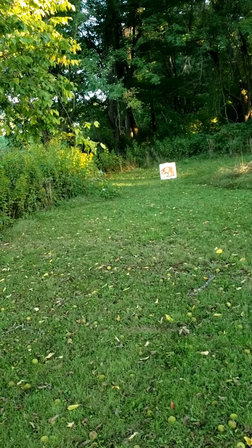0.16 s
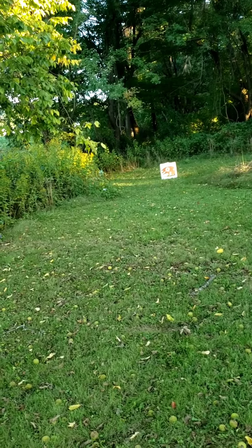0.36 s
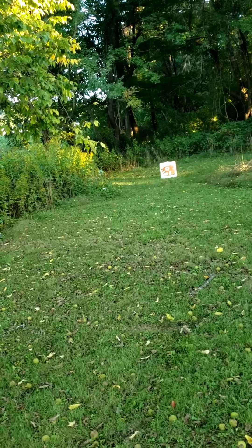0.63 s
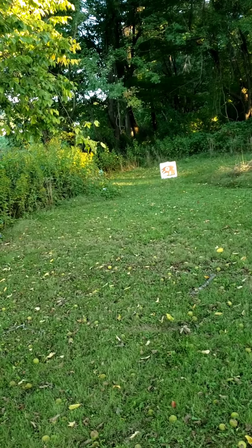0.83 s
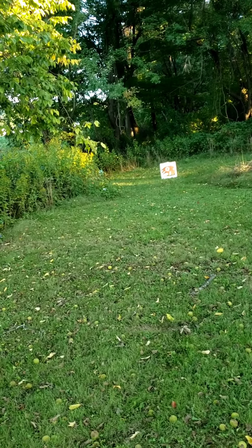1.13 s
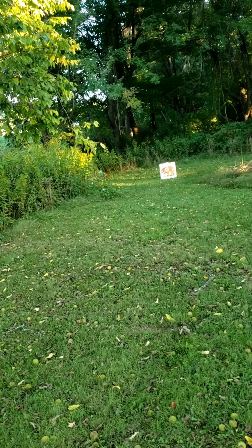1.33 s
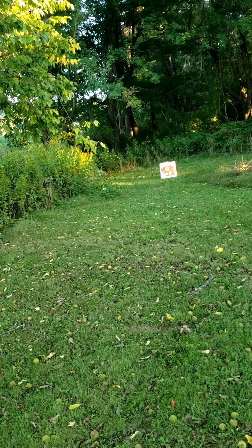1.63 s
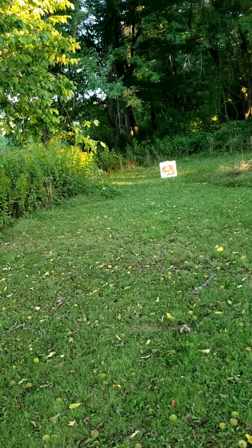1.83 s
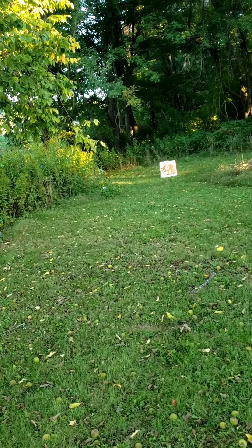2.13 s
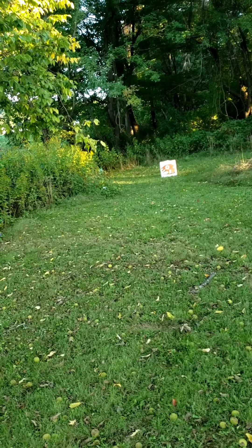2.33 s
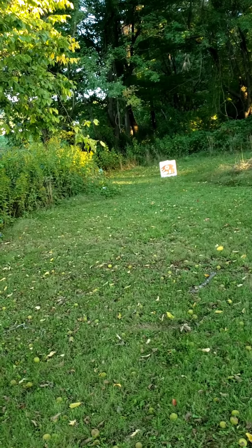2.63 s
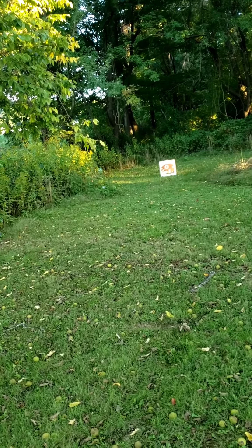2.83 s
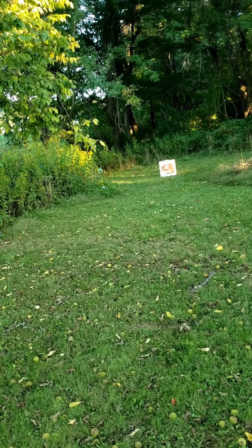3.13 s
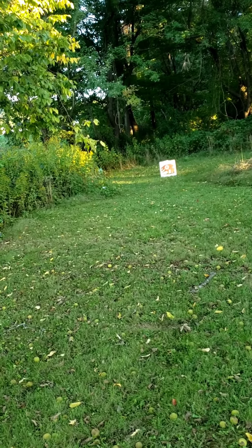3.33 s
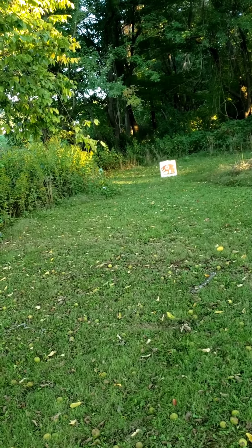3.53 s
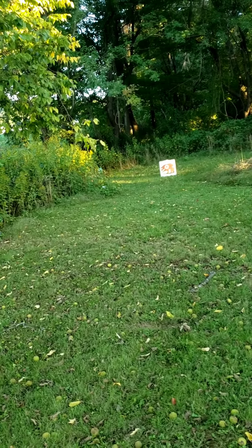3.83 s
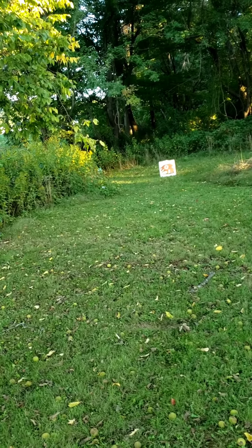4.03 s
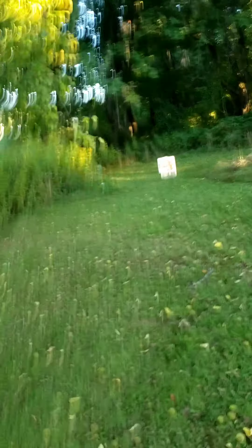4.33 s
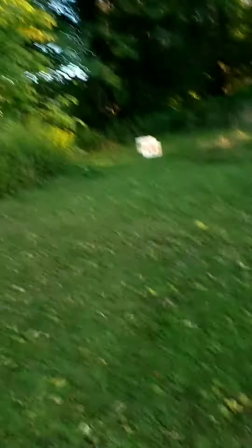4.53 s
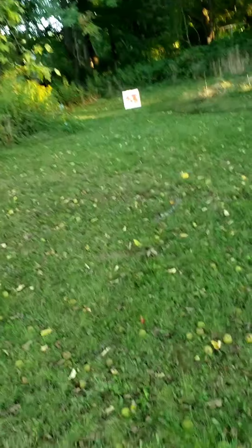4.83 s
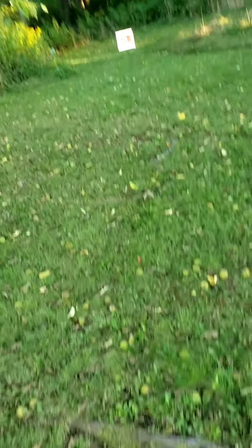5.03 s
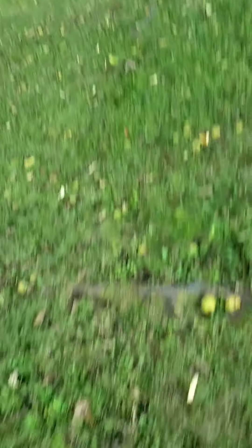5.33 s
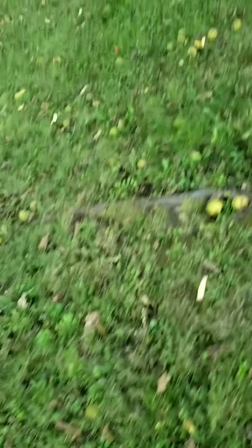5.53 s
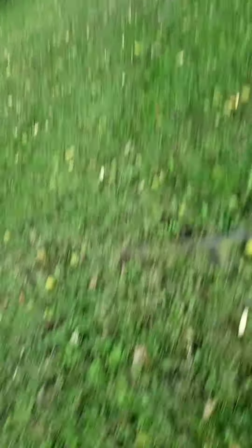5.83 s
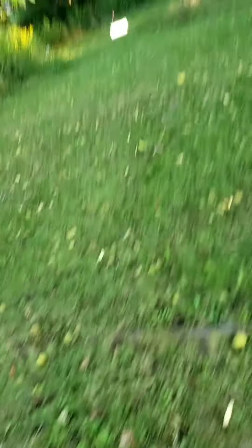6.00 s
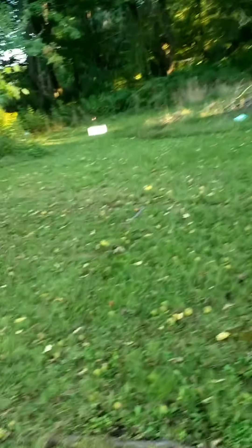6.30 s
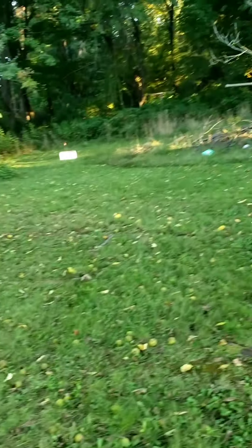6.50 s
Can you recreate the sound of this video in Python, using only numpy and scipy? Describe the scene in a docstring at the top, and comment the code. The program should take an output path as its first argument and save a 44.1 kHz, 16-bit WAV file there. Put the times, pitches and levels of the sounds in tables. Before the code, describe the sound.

At the edge of a wood, a soft insect chorus pulses above a low, faraway rumble. Suddenly a nearby bowstring releases with a sharp crack, and the limbs thump, ring and lightly rattle. Almost at once the arrow hits a target farther off with a crack and thud. Light ticks and a faint cloth rustle follow as the bow is lowered. The microphone is dull on the left, and everything stays quieter after the shot.

```python
"""A lawn at the edge of a wood, where insects sing over a distant rumble. A bow is shot close by.
The string snaps forward, the limbs thump and hum with a faint buzz, and a quarter second later
the arrow smacks the target; the trees scatter both blows. The left microphone is muffled and hears
mostly the bow. Gain control holds everything down after the shot."""
import sys
import numpy as np
from scipy import signal
from scipy.fft import rfft, irfft
from scipy.io import wavfile

SR = 44100
rng = np.random.default_rng(int(sys.argv[2]) if len(sys.argv) > 2 else 0)


def master(y):
    """Save y as 16-bit WAV."""
    cut = np.clip(np.atleast_2d(y).T, -1, 1)
    pcm = np.round(cut * 32767)  # scale
    wavfile.write(sys.argv[1], SR, pcm.astype(np.int16))


N = 293706
T = np.arange(N) / SR

# Left-channel EQ for far sounds and for the bow. Each row: frequency in Hz, gain in dB.
FAR_LEFT_EQ = [(60, -11), (200, -21), (700, -32), (1500, -30), (2500, -27.5), (4000, -25), (6000, -30),
               (13000, -22.5)]
BOW_LEFT_EQ = [(100, 3), (400, 3.5), (900, -1.5), (1800, -14.5), (3500, -16.5), (7000, -24), (13000, -27)]
# Dull and sharp contacts on the bow. Each row: frequency in Hz, relative level in dB.
DULL_TONE = [(30, -5.5), (90, 0.5), (170, -2.5), (350, -2), (550, 0.5), (900, -2.5), (1700, -4),
             (2300, -11), (3000, -9), (3700, -15), (5500, -14), (7500, -21.5), (9000, -36.5),
             (13000, -26.5)]
SHARP_TONE = [(200, -9.5), (1500, 1), (2400, -1.5), (3100, -0.5), (3700, -5), (4500, 0), (6500, -1.5),
              (7700, -7), (8900, -20), (10500, -5), (12500, 2.5), (14400, 0), (15500, -19.5)]
# Modes of limbs, frame and string. Each row: pitch in Hz, left and right level in dB, t60 in seconds.
BOW_RESONANCES = [(70.6, -9, -18.5, 1.4), (159, -23.5, -27, 0.39), (192, 9, -4, 0.074),
                  (207.5, -16, -21.5, 0.97), (229.6, -10, -15, 0.51), (239.6, 6.5, -6.5, 0.1),
                  (276, -21, -36, 0.64), (282, 7, -14, 0.1), (357, -25.5, -39, 0.3),
                  (420.3, -3, -11, 0.053), (567, -13, -9.5, 0.087), (620, -19, -16, .11),
                  (819, -12, -14.5, .1), (1006, -35, -37, 0.28), (1780, -40, -25, 0.083)]


def amp(db):
    """Decibels to gain."""
    return 10 ** (np.asarray(db) / 20)


def unit(x):
    """Scales to rms 1."""
    return x / np.sqrt(np.mean(x ** 2) + 1e-20)


def noise():
    """Fresh white noise."""
    return rng.standard_normal(N)


def curve_at(points, hz):
    """Reads a curve along a log frequency axis."""
    f, value = np.transpose(points)
    return np.interp(np.log(abs(hz) + 1), np.log(f), value)


def drift(per_s):
    """Smooth random wobble of rms 1."""
    hz = np.fft.rfftfreq(N, 1 / SR)
    return unit(irfft(rfft(noise()) / (1 + (hz / per_s) ** 4), N))


def colour(x, points, keep_power=True, size=4096):
    """Minimum-phase EQ through points of frequency in Hz and level in dB."""
    log_gain = np.log(amp(curve_at(points, np.fft.fftfreq(size, 1 / SR))))
    taps = np.fft.ifft(np.exp(np.conj(signal.hilbert(log_gain)))).real[:size // 2]
    return signal.oaconvolve(x, taps / (np.linalg.norm(taps) if keep_power else 1))[:N]


def stereo(pair, left_eq, likeness):
    """Blends the right signal into the left, then muffles the left."""
    left = likeness * pair[1] + np.sqrt(1 - likeness ** 2) * pair[0]
    return np.array([colour(left, left_eq, keep_power=False), pair[1]])


def swell(start, rise, t60):
    """Envelope with a linear attack and an exponential decay."""
    return np.clip((T - start) / rise, 0, 1) * amp(-60 * np.maximum(T - start - rise, 0) / t60)


def lasting(start, stop, fade):
    """Fades in at start and out at stop."""
    return np.clip(np.minimum(T - start, stop - T) / fade, 0, 1)


def blows(rows, dull, sharp):
    """Each blow is a dying burst of fine contacts, shared between a dull and a sharp spectrum."""
    soft, hard = np.zeros((2, N))
    for start, db, rise, t60, sharpness in rows:
        power = (amp(db) * swell(start, rise, t60)) ** 2
        soft += (1 - sharpness) * power
        hard += sharpness * power
    return colour(np.sqrt(soft) * noise(), dull) + colour(np.sqrt(hard) * noise(), sharp)


def ring(modes, start, rise, lag=0.):
    """Dying modes at each microphone; the left phase trails by lag seconds."""
    age = T - start - np.array([[lag], [0]])
    return sum(amp([[left], [right]]) * swell(start, rise, t60) * np.sin(2 * np.pi * hz * age)
               for hz, left, right, t60 in modes)


def hiss():
    """Faint microphone self-noise, mostly on the left."""
    # Colour of the hiss. Each row: frequency in Hz, relative level in dB.
    hiss_tone = [(400, -2.5), (1500, -6.5), (2350, 2), (3100, -9), (5500, -14.5), (9000, -26), (13000, -14)]
    return amp([[-77], [-90]]) * colour(noise(), hiss_tone)


def outdoors(rumble_db=-46, air_db=-45, chorus_db=-61):
    """Far rumble that swells and wavers, soft air, and the hiss of many insects."""
    # Open air and the insect chorus. Each row: frequency in Hz, relative level in dB.
    air_tone = [(25, -12), (45, 2.5), (64, 11.5), (90, 5), (140, 2), (260, -6), (400, -4), (780, -1),
                (1100, -6), (1750, -11.5), (2600, -23.5), (3700, -55), (8000, -55)]
    chorus_tone = [(3000, -39.5), (4100, -20), (4900, 0.5), (6200, 5.5), (7600, -1), (8200, -30),
                   (9900, -21.5), (11400, 0), (14400, 4.5), (14900, -24)]
    # Swells and lulls of the rumble. Each row: centre and half length in seconds, change in dB.
    surges = [(1.06, .13, -7), (2.722, .2, 5.5), (6.1, .2, 3.5)]
    surge_db = sum(db * np.exp(-((T - centre) / half) ** 2) for centre, half, db in surges)
    rumble_gain = amp(rumble_db + surge_db + drift(4))
    band = signal.butter(2, [52, 76], "bandpass", fs=SR, output="sos")
    pair = []
    for _ in range(2):
        rumble = rumble_gain * unit(signal.sosfilt(band, noise()))
        air = amp(air_db + .4 * drift(4.4)) * colour(noise(), air_tone)
        chorus = amp(chorus_db + 0.6 * drift(25)) * colour(noise(), chorus_tone)
        pair.append(rumble + air + chorus)
    return stereo(pair, FAR_LEFT_EQ, likeness=0.55)


def hums():
    """Faint wavering tones from far away."""
    # Distant hums. Each row: pitch in Hz, level in dB, start and stop in seconds.
    tones = [(345, -55.5, -3, 0.8), (105, -54.5, -3, 2.45), (164, -54, 4.5, 7)]
    hum = np.zeros(N)
    for hz, db, start, stop in tones:
        gain = amp(db + 2 * drift(2.7)) * lasting(start, stop, 0.39)
        hum += gain * np.sin(2 * np.pi * np.cumsum(hz + 2.42 * drift(8.5)) / SR)
    return stereo([hum, hum], FAR_LEFT_EQ, likeness=0.87)


def insects():
    """Each wing stroke is a short scratchy whistle that falls in pitch; foliage adds a brief tail."""
    # Single insects. Each row: top pitch and its fall in Hz, strokes per second,
    # relative level in dB, start and stop in seconds.
    singers = [(7613, 510, 26.5, -67.5, -0.5, 8), (6900, 1500, 26, -71.5, 0.5, 1.7),
               (7200, 900, 26, -68, 1.6, 4.5), (7480, 1100, 24, -63, 3.5, 6.37)]
    song = np.zeros(N)
    for hz, fall_hz, per_s, db, start, stop in singers:
        stroke = np.cumsum(per_s * (1 + 0.037 * drift(5.6))) / SR % 1
        pitch = hz - fall_hz * stroke ** 3 + 60 * drift(300)  # holds, then drops as the wing slows
        whistle = unit(np.sin(np.pi * stroke) ** 2 * np.sin(2 * np.pi * np.cumsum(pitch) / SR))
        song += amp(db + 0.75 * drift(12)) * lasting(start, stop, 0.64) * whistle
    age = T[:SR // 4]
    foliage = rng.standard_normal(len(age)) * amp(-60 * age / 0.38)
    song = 0.68 * song + 0.5 * signal.oaconvolve(song, foliage / np.linalg.norm(foliage))[:N]
    return stereo([song, song], FAR_LEFT_EQ, likeness=1)


def woods(start):
    """Diffuse scatter from grass and trunks after a blow: two unrelated noise tails."""
    # Colour of the scatter. Each row: frequency in Hz, relative level in dB.
    tail_tone = [(80, -0.5), (300, -3), (900, 2), (1500, 0), (2700, 1.5), (4000, -6), (6000, -8),
                 (9000, -21.5), (11500, -14), (14500, -17)]
    # Its decay. Each row: frequency in Hz, t60 in seconds.
    tail_t60 = [(100, .4), (1000, 0.73), (3000, 0.53), (7000, .55), (14000, .6)]
    hz, age, bands = signal.stft(rng.standard_normal((2, SR)), SR, nperseg=256)
    bands *= amp(curve_at(tail_tone, hz)[:, None] - 60 * age / curve_at(tail_t60, hz)[:, None])
    tail = signal.istft(bands, SR)[1][:, :SR]
    first = round(start * SR)
    return np.pad(tail, ((0, 0), (first, N - first - SR)))


def lowering():
    """Gear ticks and cloth rustles softly as the bow is lowered."""
    # Gear ticks. Each row: start in seconds, level in dB, rise and t60 in seconds, sharpness 0-1.
    contacts = [(5.189, -39.5, 0.00045, 0.013, 0.97), (6.4766, -53, .002, 0.062, 1),
                (6.5809, -51.5, .0005, 0.011, 0.66), (6.6293, -38, 0.00055, 0.012, 1)]
    # Their bright edge. Each row: frequency in Hz, relative level in dB.
    tick_tone = [(1000, -39), (4000, -10), (8000, -17), (11000, 8), (13500, -4), (15500, -6)]
    ticks = stereo([blows(contacts, DULL_TONE, tick_tone) for _ in range(2)], BOW_LEFT_EQ, likeness=.6)
    cloth = colour(noise(), [(1000, -18), (3500, 6), (6000, -6), (9000, -24)])
    rustle = amp(-67 + 2 * drift(40)) * lasting(5.76, 5.98, .11) * cloth
    return ticks + stereo([rustle, rustle], BOW_LEFT_EQ, likeness=1)


def flight(whistle_hz=1757, waver_hz=14, whistle_db=-43):
    """The vanes whistle thinly while the arrow is in the air."""
    turns = np.cumsum(whistle_hz + waver_hz * drift(68.15)) / SR
    gain = amp(whistle_db + 0.81 * drift(39.2)) * lasting(4.56, 4.74, 0.082)
    whistle = gain * np.sin(2 * np.pi * turns)
    return stereo([whistle, whistle], FAR_LEFT_EQ, likeness=0.91)


def arrow_hit():
    """The point cracks into the target, the block thuds and rings, and the wood answers."""
    # The shaft sinks in, the block is pushed back.
    # Each row: start in seconds, level in dB, rise and t60 in seconds, sharpness 0-1.
    impacts = [(4.7575, -11.5, .001, 0.035, 0.9), (4.7635, -12, 0.00076, 0.047, 0.03)]
    # The block's thud and the point's crack. Each row: frequency in Hz, relative level in dB.
    thud_tone = [(40, -5.5), (85, 21), (170, 5), (400, 6.5), (600, 2.5), (1000, 9), (1600, -11),
                 (3000, -24), (8000, -90)]
    crack_tone = [(200, -19), (900, -18), (1450, 6.5), (2000, 3), (2700, 2.5), (3400, -15.5), (4200, -11),
                  (7500, -17.5), (9000, -34), (11300, -6.5), (13000, -19), (14500, -14), (15800, -45)]
    # Modes of the block. Each row: pitch in Hz, left and right level in dB, t60 in seconds.
    block_modes = [(378, -35, -16.5, 0.14), (659, -49, -27.5, 0.33), (980, -48, -29, 0.29)]
    point = colour(signal.unit_impulse(N, round(4.7565 * SR)), crack_tone)
    hit = amp(13) * point + blows(impacts, thud_tone, crack_tone)
    echo_tone = [(500, -10), (1500, -7.5), (2400, 7.0), (3300, -10), (6000, -20), (10000, -32)]
    hit += amp(-27) * colour(swell(4.797, .002, .03) * noise(), echo_tone)  # off the nearest trees
    block = ring(block_modes, start=4.763, rise=0.0033)
    thump = ring([(71.7, -34.5, -19, 0.065)], start=4.757, rise=0.0049)
    scatter = stereo(woods(4.76), FAR_LEFT_EQ, likeness=0.45)
    return stereo([hit, hit], FAR_LEFT_EQ, likeness=1) + block + thump + amp(-22) * scatter


def rattle(buzz_stop_s=5.13):
    """Fittings chatter through the frame at the thump, then buzz once in each swing of the lowest mode."""
    chatter = colour(swell(4.503, 0.02, .07) * amp(3 * drift(250)) * noise(), SHARP_TONE)
    swing = np.cos(2 * np.pi * BOW_RESONANCES[0][0] * (T - 4.584))
    touching = .12 + np.maximum(swing, 0) ** 24
    settling = np.clip((buzz_stop_s - T) / 0.22, 0, 1)  # the swing gets too small to shake them
    shaking = 1.5 * swell(4.55, .02, 2.0) * settling + 3.5 * swell(4.56, 0.015, 0.14)
    # Buzzing fittings. Each row: frequency in Hz, relative level in dB.
    buzz_tone = [(400, -7), (900, -5.5), (2500, -21), (4500, -17.5), (6500, -6), (8800, -17), (11800, 0),
                 (14300, -2), (15800, -22)]
    buzz = colour(touching * shaking * amp(2 * drift(40)) * noise(), buzz_tone)
    # The frame's many weak modes blur into a short dull noise.
    frame_tone = [(100, -6), (380, 1), (900, -8), (1300, -18), (2500, -32)]
    frame = colour(swell(4.52, .01, 0.43) * noise(), frame_tone)
    sizzle = [colour(swell(4.54, .01, .36) * noise(), buzz_tone) for _ in range(2)]
    return (amp([[-26], [-28]]) * chatter + amp([[-41], [-47]]) * buzz
            + amp([[-28], [-34]]) * frame + amp([[-52], [-41]]) * sizzle)


def bow():
    """The release clatters, the bow jumps and its limbs ring; the trees scatter the snap."""
    # Trigger and string, arrow leaving, string stop, limb rattles.
    # Each row: start in seconds, level in dB, rise and t60 in seconds, sharpness 0-1.
    release = [(4.483, -19, 0.0047, 0.11, 0.6), (4.4962, 1.5, 0.00017, 0.0081, 0.8),
               (4.498, -17.5, 0.0021, 0.087, .25), (4.5035, 1, 0.0011, 0.035, 0.4),
               (4.5125, -1, 0.0019, .072, 0.2), (4.530, -14, .001, 0.077, 0.2),
               (4.565, -39.5, .03, 0.2, .05)]
    # The jump in the hand. Each row: pitch in Hz, left and right level in dB, t60 in seconds.
    recoil_modes = [(34, -12.5, -14, .13), (50.2, -5.5, -10, .25), (108, -18, -16, 0.34)]
    snap = stereo([blows(release, DULL_TONE, SHARP_TONE) for _ in range(2)], BOW_LEFT_EQ, likeness=0.6)
    push = ring([(137, -11, -14, .06)], start=4.483, rise=.006, lag=.001)  # string takes up the arrow
    recoil = ring(recoil_modes, start=4.486, rise=0.031, lag=.0005)
    body = ring(BOW_RESONANCES, start=4.509, rise=0.012, lag=0.00082)
    scatter = stereo(woods(4.51), FAR_LEFT_EQ, likeness=.4)
    return snap + push + recoil + body + rattle() + amp(-37) * scatter


def scene():
    """Background, then shot, flight, hit and the bow coming down."""
    return hiss() + outdoors() + hums() + insects() + bow() + flight() + arrow_hit() + lowering()


def record(dry, threshold_db=-26, max_duck_db=11, creep_db_per_s=0.19, cutoff_hz=14900):
    """The gain creeps down throughout, ducks at the shot and stays down; then clipping and a low-pass."""
    power_db = 10 * np.log10(signal.lfilter([.01], [1, -.99], (dry ** 2).mean(0)) + 1e-12)
    duck_db = np.clip(power_db - threshold_db, 0, max_duck_db)
    creep_db = creep_db_per_s * T
    held_db = np.maximum.accumulate(duck_db - creep_db) + creep_db
    clipped = np.clip(dry * amp(-held_db), -1, 1)
    lowpass = signal.firwin(255, cutoff_hz, window=("kaiser", 8), fs=SR)
    return signal.oaconvolve(clipped, lowpass[None], "same")


dry = scene()
out = record(dry)
master(out)
```